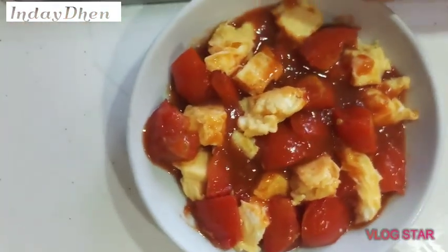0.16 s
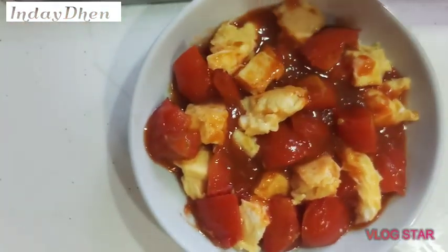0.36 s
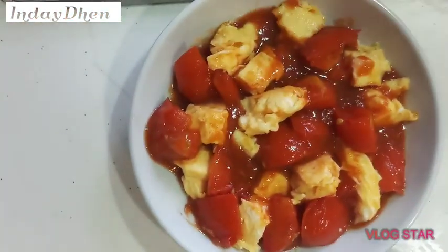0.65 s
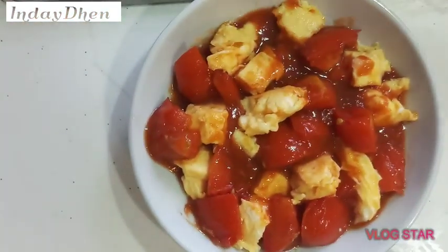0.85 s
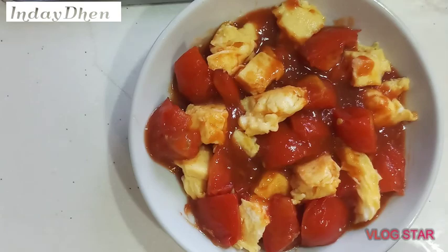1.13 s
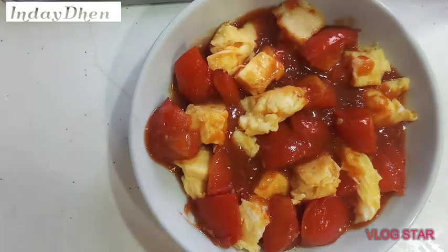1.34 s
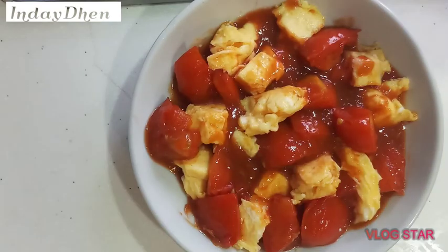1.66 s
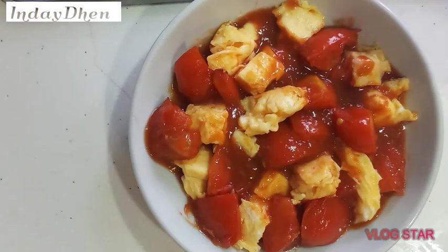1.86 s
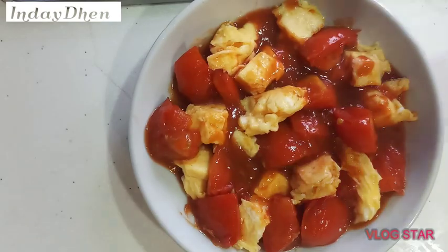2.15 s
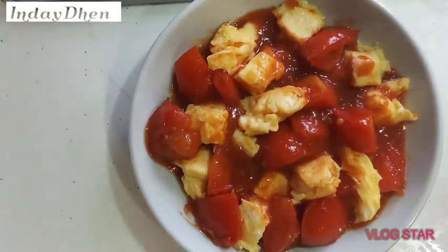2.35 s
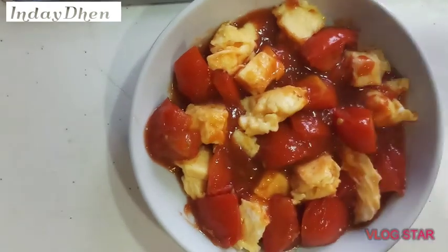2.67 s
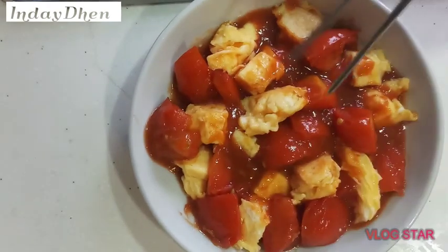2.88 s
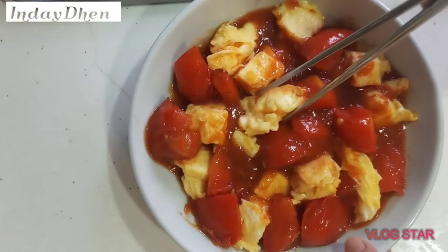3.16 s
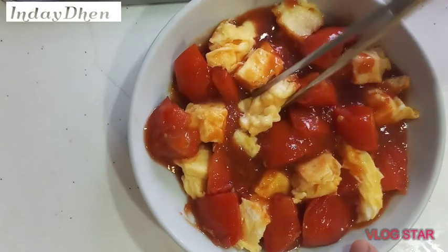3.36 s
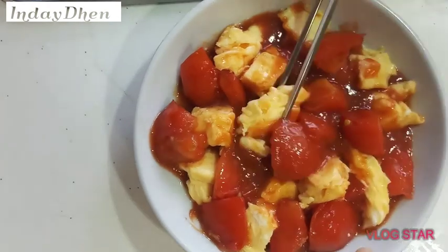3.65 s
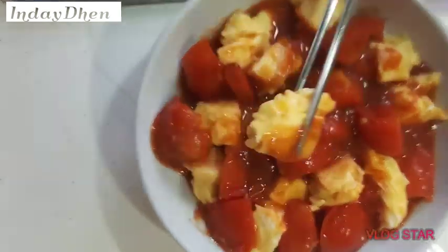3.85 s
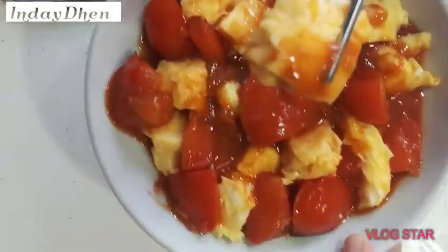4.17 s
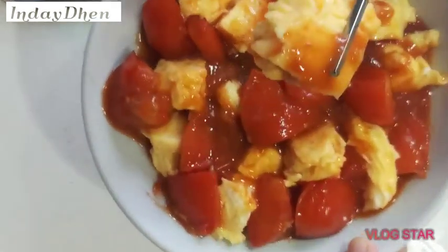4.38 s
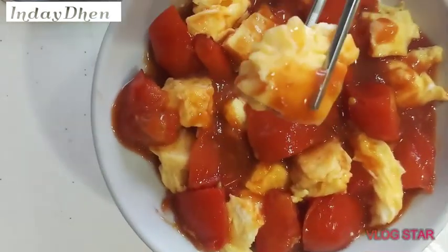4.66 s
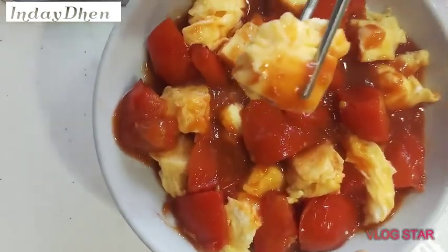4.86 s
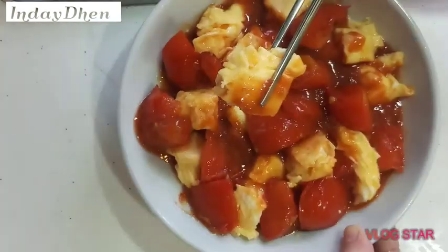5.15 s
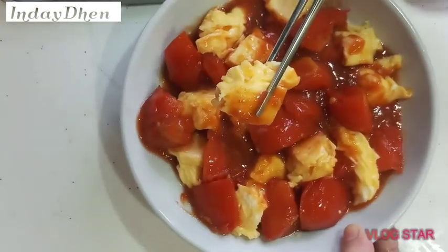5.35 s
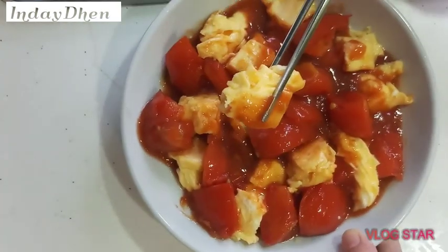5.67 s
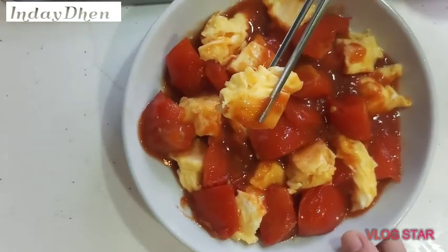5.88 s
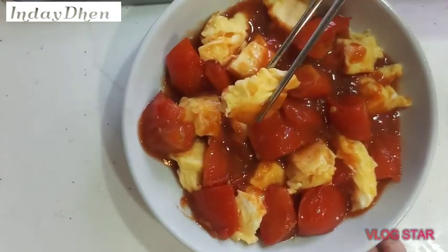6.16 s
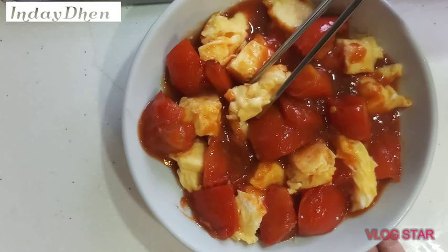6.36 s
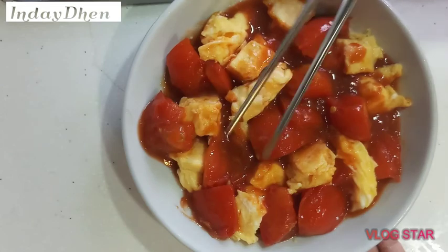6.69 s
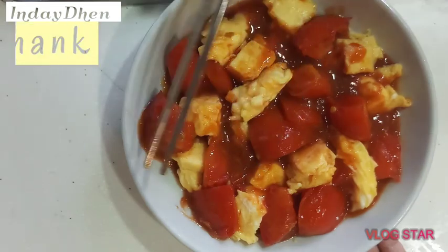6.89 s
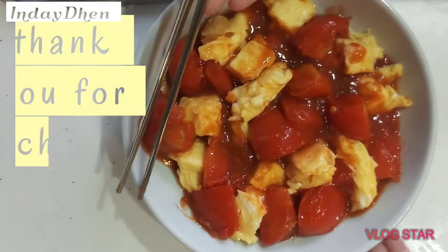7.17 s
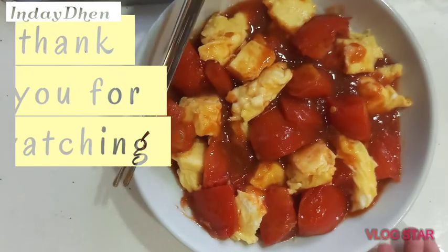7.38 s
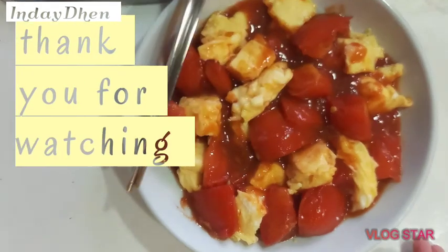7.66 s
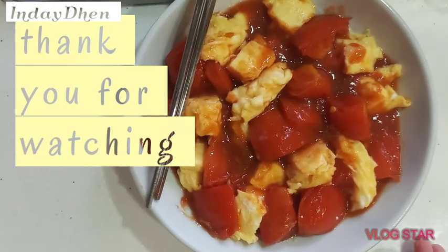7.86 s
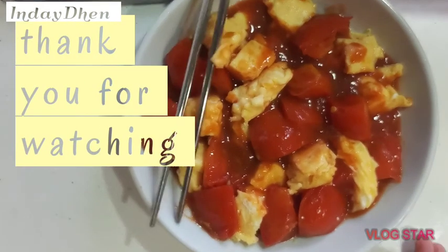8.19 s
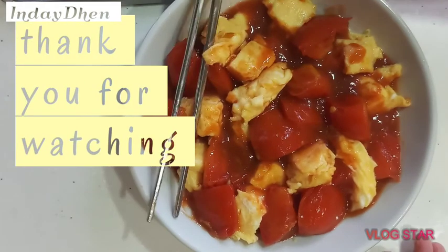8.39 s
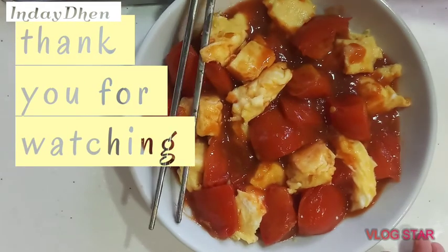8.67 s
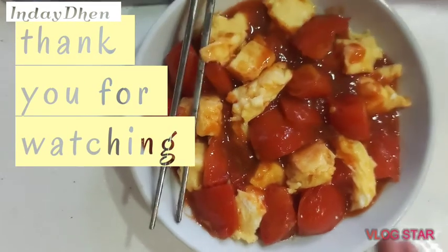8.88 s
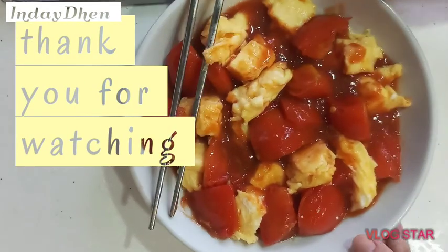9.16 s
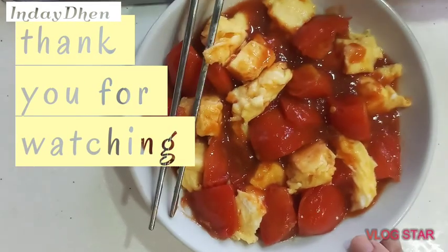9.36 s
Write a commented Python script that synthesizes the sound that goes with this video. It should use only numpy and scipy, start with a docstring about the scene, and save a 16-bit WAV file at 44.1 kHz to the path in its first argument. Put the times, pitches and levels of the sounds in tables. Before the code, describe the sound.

An extractor fan hums steadily in a small kitchen. After a dull knock, steel chopsticks scrape briefly off a counter close to the microphone and click lightly together. Two more wooden knocks follow. Then the chopsticks tap and rub against a ceramic bowl in a run of bright, ringing clicks, ending with one loud clatter as they drop on the rim.

```python
"""An extractor fan hums steadily in a small kitchen, and a dull knock sounds nearby.
In front of the microphone, steel chopsticks are dragged off a counter and click together, ringing in
their bending modes. More knocks follow; the sticks are laid on a ceramic bowl's rim, then dropped there.
The two microphone ports hear the bass alike and the treble apart; loud hits pull the gain down."""
import sys
import numpy as np
from scipy import signal
from scipy.fft import rfft, irfft, next_fast_len
from scipy.io import wavfile
from scipy.ndimage import uniform_filter1d

SR = 44100
rng = np.random.default_rng(int(sys.argv[2]) if len(sys.argv) > 2 else 0)


def unload_wav(signal):
    """Save mono or channel-first audio to the path in sys.argv[1] as 16-bit WAV at rate SR, clipped to [-1, 1]."""
    wavfile.write(
        sys.argv[1],
        SR,
        np.round(np.clip(np.atleast_2d(signal).T, -1, 1) * 32767).astype(np.int16),
    )


N = 420273

# Stick clicks: time_s, level_db, ring_share (of the free ring), tilt_db_per_octave, second_stick_db,
# then how hard the first stick's modes are caught: main_pair_db, top_pair_db, low_group_db
STICK_CLICKS = [(1.875, -29.5, 0.2, -3, -1, -14, -4, 0.1), (1.903, -29.5, .3, 1, 8, -14, -3, 0.1),
                (2.001, -27.5, 0.17, 2, 10, -8, -4, 0.1), (2.040, -30, .16, 5, 11, -8, -3, 0.1),
                (2.130, -24.5, .22, -3, 3, -8, -3, 0.1), (2.141, -17, .27, 15, 8, -5, 0.1, 0.1),
                (2.150, -20.5, .3, 5, 6, -3, 0.1, 0.1), (2.209, -37, .3, 14, 12, -5, 0.1, 0.1),
                (2.735, -42, .98, -5, 28, 0.1, 0.1, 0.1), (2.808, -34, .4, 11, 28, 0.1, 0.1, 0.1),
                (2.943, -25, 0.37, -1, 28, 0.1, 0.1, 0.1), (3.429, -21, 0.094, 0, 10.5, 0, -4, 0.1),
                (3.575, -34.5, .25, 0, 3, -2, -3, 0.1), (6.833, -44, .6, 2, 20, 0.1, 0.1, 0.1),
                (7.139, -28, .3, -0.5, -14, -14, -12, -1), (7.152, -31, 0.62, 2, -14, 5, -5, -2),
                (7.259, -22.5, 0.59, 7, -8, -14, -4, 0.1), (7.269, -31, .4, -2, -8, -4, -5, -3),
                (7.351, -32.5, .4, 0, -18, -3, -14, -8), (7.372, -38, .3, -3, -6, -1, -10, -3),
                (7.647, -31.5, 0.46, 2, -3, -3, -9, -3), (7.713, -35, 0.76, -7, -14, -6, -12, -5),
                (7.877, -36, .6, -2, -14, 7, -12, -5), (7.935, -18, 0.23, 4, -11, 4, 1, -9),
                (7.942, -21, 0.21, 4, -7, 1, -1, -7), (8.060, -43, .2, -7, -11, -8, -10, -8),
                (8.18, -32, 0.32, -4, -14, 6, -8, -3), (8.206, -28, 0.32, 1, -7, 1, -3, -10),
                (8.221, -29, .28, 2, -9, -6, -2, -7), (8.590, -21.5, 0.28, -1, -18, 1, -10, 6),
                (8.642, -23.5, .16, -1, -14, 4, -7, 2), (8.662, -35, .35, -2, -14, -1, -10, 3),
                (8.762, -22, .28, -1, -8, -4, -4, -5), (8.771, -23, .28, -3, -10, -3, 5, -2),
                (8.802, -37, .3, 7, -3, -2, -5, 3), (9.057, -3, .54, -1, -12, 11.5, 10, 6),
                (9.064, -10, 0.62, 0.5, -5, 2, 11, 0.1), (9.073, -11, 0.58, -1, -8, 3, 5, 0.1)]
MAIN_PAIR_HZ, TOP_PAIR_HZ, LOW_GROUP_HZ = (7300, 7550), (14000, 14300), (4900, 5500)
# Bending modes of each stick: pitch_hz, level_db, t60_s
FIRST_STICK_MODES = [(4953, -9, .07), (5250, -12, .05), (5385, -10, .05), (6300, -16, .05),
                     (6907, -16, .075), (7365, -3, .1), (7488, 0, .11), (7660, -9, .09), (8100, -14, .07),
                     (10560, -7, .06), (10640, -8, .07), (14055, -8, .1), (14170, -13, .08)]
SECOND_STICK_MODES = [(3400, -14, .03), (5600, -16, .04), (8395, -4, .09), (8650, -9, .07),
                      (9200, -12, .09), (12390, -4, .09), (12750, -6, .075), (13460, -12, .09),
                      (15300, -13, .06)]
# Where the sticks are (on the counter, lifted, in the food, on the rim): until_s, crack_db, thud_db
STICK_PLACES = [(2.135, 8.5, -5.5), (3.1, 7, -34), (6.9, 8.5, -35), (9.6, -9.5, -33)]
# Sticks rubbing on the rim or each other: start_s, strongest_s, end_s, level_db, scrape_db
RUB_STROKES = [(7.135, 7.157, 7.3, -62, 2), (7.29, 7.355, 7.45, -60, 2), (7.86, 7.905, 7.97, -50, -2),
               (7.916, 7.932, 7.968, -48, 4), (8.04, 8.062, 8.08, -64, 15), (8.15, 8.205, 8.24, -51.5, 6),
               (9.05, 9.065, 9.02, -37, -7)]
# Touches that ring the bowl: time_s, peak_db
BOWL_TOUCHES = [(7.139, -43), (7.151, -45), (7.372, -36), (7.91, -50), (7.95, -48), (8.766, -37),
                (9.057, -23)]
# Modes of the bowl's rim: pitch_hz, level_db, t60_s
RIM_MODES = [(4680, 0, .05), (4760, -3, .045)]
# Sticks dragged over the counter: start_s, strongest_s, end_s, level_db, treble_db
DRAG_STROKES = [(1.87, 1.905, 2.1, -60.5, 11), (2.053, 2.125, 2.14, -62, 12.5),
                (2.127, 2.173, 2.217, -31.5, 0.5), (2.196, 2.201, 2.222, -37, -8),
                (2.252, 2.278, 2.32, -58, 6)]
# Resonances of the counter's board: pitch_hz, width_hz, level_db
BOARD_MODES = [(810, 400, -9), (1030, 150, -7), (1194, 64, 5.5), (1593, 104, 2), (1970, 99, -8),
               (2880, 300, -7), (3430, 340, -14)]
# Nearby knocks: time_s, level_db, tilt_db_per_octave, rattle_db, snap_db, thud_db
DULL_KNOCKS = [(0.341, -25.5, -2, -4, -9, -3.5), (5.48, -16.5, 4, -1.5, 16, 1.5),
               (5.485, -15.5, -1, -1, 0, 1), (5.898, -22, -1.5, -12, -4, -9),
               (5.906, -24.5, -6, -10, -6, 10), (5.965, -25.5, 0.1, -2, -5, -7),
               (5.9693, -18, 1, -4, -3, 6)]
# Modes of the knocked wood and of its hard edge: pitch_hz, level_db, t60_s
WOOD_MODES = [(235, -22, 0.07), (360, -1.5, 0.063), (447, 0, 0.06), (640, -14, 0.028), (750, -3.5, 0.086),
              (960, 2.5, 0.046), (1070, -3.5, 0.091), (1348, 2, 0.055), (2100, -29, 0.032),
              (2570, -19, 0.03), (3500, -23, 0.031), (3580, -1, 0.026), (4640, -18, 0.034)]
EDGE_MODES = [(1120, -3, .016), (2450, -1, .011), (2750, -2, .010), (3800, -4, .009), (4900, -5, .009),
              (8000, -22, .006), (11500, -30, .005)]
# Faint rustles: start_s, strongest_s, end_s, level_db
RUSTLE_STROKES = [(2.3, 2.55, 3.9, -55), (6.1, 6.4, 7.1, -51.5)]
# Spectral shape of the fan's rushing air: frequency_hz, level_db
AIR_SPECTRUM = [(15, -66), (25, -34), (123, -11.5), (157, -5.5), (190, -3), (249, -5.5), (277, -15),
                (373, -3), (520, -16.5), (640, -14), (1100, -12), (1400, -23), (1610, -15), (2110, -21),
                (7920, -29.5), (16000, -44.5)]
# Duct resonances: pitch_hz, width_hz, lift_db
DUCT_MODES = [(68.2, 4.6, 10), (197, 7.8, 10), (254.4, 24, 5), (417, 65, 5), (1255, 130, 7.5),
              (1610, 20, 1), (3870, 100, 4.5), (6130, 740, 4), (7930, 2700, 3.5)]
# Fan motor tones: pitch_hz, rms_db
MOTOR_TONES = [(107.7, -64), (188.4, -50), (376.8, -53), (565.2, -68), (1115, -60), (1244, -66),
               (1416, -73), (1637, -72), (2476, -74), (2810, -76)]
# How alike the two ports hear: frequency_hz, correlation
PORT_LIKENESS = [(25, .96), (60, .988), (150, .995), (340, .99), (690, .84), (1030, .7), (1400, .3),
                 (2070, .55), (3000, .35), (5000, .15), (15000, .05)]
# The housing's shading of the fan and of near sounds: frequency_hz, left_minus_right_db
FAN_SHADING = [(60, 0.0), (110, 0.0), (200, 0.0), (380, -0.5), (700, -3.0), (1290, -6.5), (2380, -1.0),
               (4400, 2.5), (8120, 0.5), (15000, 2.0)]
NEAR_SHADING = [(300, 0), (1100, -5), (2400, 3), (3800, 1), (5000, 3.5), (7500, 2), (9000, 2.5), (14000, 3)]
# Phase between the ports for the same two: frequency_hz, left_lead_rad
FAN_PHASE = [(300, 0.0028), (950, 0.02), (1800, 2.68), (3100, 4.6), (5000, 3.57)]
NEAR_PHASE = [(300, 0), (1000, 0.6), (2000, 1.7), (5000, 1.5), (12000, 1.7)]


def stick_clicks():
    """Each click rings both sticks, cracks at the contact and pushes the counter's board."""
    out, pushes = quiet(), quiet()
    for time_s, db, ring_share, tilt_db, second_db, main_db, top_db, low_db in STICK_CLICKS:
        _, crack_db, thud_db = next(place for place in STICK_PLACES if time_s < place[0])
        crack_db += tilt_db - 25.5 * ring_share   # a free ring hides the crack, a hard contact bares it
        brightness = 2 ** (tilt_db / 6)
        crack = from_db(crack_db) * burst(3900 * brightness, 10300 * brightness, t60_s=0.24 * ring_share)
        modes = lifted(FIRST_STICK_MODES, *MAIN_PAIR_HZ, main_db)
        modes = lifted(modes, *TOP_PAIR_HZ, top_db)
        modes = lifted(modes, *LOW_GROUP_HZ, low_db)
        first = strike(modes, ring_share, tilt_db)
        second = from_db(second_db) * strike(SECOND_STICK_MODES, ring_share, tilt_db)
        add(out, time_s, from_db(db) * (first + second + crack) / (1 + from_db(second_db)))
        add(pushes, time_s, from_db(db + thud_db) * burst(380, 6500, t60_s=0.0035))
    return out + board(pushes)


def stick_rubs():
    """Dense tiny slips ring the sticks' modes, hiss, and scrape dryly on the glaze."""
    catches = grains(per_s=1300, spread_db=1.3)
    swell = dict(ends_db=23.4, roundness=0.8)
    slips = catches * strokes(RUB_STROKES, **swell)
    scrape_db = [row[-1] for row in RUB_STROKES]
    scrape = catches * strokes(RUB_STROKES, **swell, extra_db=scrape_db) + 1e-18
    out = bandpass(scrape, 2600, 6900)
    out += from_db(15) * resonate(scrape, 6500, 500)   # the glaze colours the scrape
    out += from_db(14) * resonate(scrape, 4740, 250)   # and so does the rim
    damped = lifted(FIRST_STICK_MODES, *LOW_GROUP_HZ, -9)   # lying on the rim damps these modes
    damped = lifted(damped, *TOP_PAIR_HZ, -1)
    for modes, ring_db, width_factor in (damped, 27, 12.3), (SECOND_STICK_MODES, 17, 13):
        for hz, db, t60_s in modes:
            out += from_db(db + ring_db) * resonate(slips, hz, width_factor / t60_s)
    hiss = from_db(-9) * np.diff(slips, prepend=0)
    return out + hiss


def bowl_rim():
    """The food-filled bowl rings briefly on one close pair of modes."""
    out = quiet()
    for time_s, db in BOWL_TOUCHES:
        add(out, time_s, from_db(db) * strike(RIM_MODES))
    return out


def stick_drags():
    """The tips judder over the counter: its board drones, the steel hisses."""
    swell = dict(ends_db=32, roundness=3.6)
    hiss = bandpass(grains(per_s=6000, spread_db=4.6), 2200, 14000, order=1)
    hiss *= strokes(DRAG_STROKES, **swell, extra_db=[row[-1] for row in DRAG_STROKES])
    judder = grains(per_s=3000, spread_db=3.7) * strokes(DRAG_STROKES, **swell)
    return board(judder) + hiss


def board(force):
    """The counter's board answers a push with its resonances."""
    return sum(from_db(db + 17) * resonate(force, hz, width_hz) for hz, width_hz, db in BOARD_MODES)


def knocks():
    """Nearby wood rings briefly under a rattle and a snap; a softer contact keeps upper modes quiet."""
    out = quiet()
    for time_s, db, tilt_db, rattle_db, snap_db, thud_db in DULL_KNOCKS:
        modes = lifted(WOOD_MODES, low_hz=0, high_hz=700, db=thud_db)
        blow = strike(modes, tilt_db=tilt_db, pivot_hz=1500, scatter_db=2.5)
        rattle = from_db(rattle_db) * burst(230, 3200 * 2 ** (tilt_db / 5), t60_s=0.046)
        snap = from_db(snap_db) * strike(EDGE_MODES, scatter_db=1)
        add(out, time_s, from_db(db) * (blow + rattle + snap))
    return bandpass(out, 130, 10500)


def rustle():
    """Fine dry grains in the treble, perhaps a sleeve near the microphone."""
    crinkle = resonate(grains(per_s=6000, spread_db=3), hz=8300, width_hz=5000)
    return crinkle * strokes(RUSTLE_STROKES, ends_db=22, roundness=2)


def extractor_fan():
    """Air noise lifted at the duct's resonances, plus wavering motor tones; returns mid and side."""
    size, t = next_fast_len(N, real=True), np.arange(N) / SR
    hz = np.arange(size // 2 + 1) * SR / size
    duct_db = sum(db / (1 + (2 * (hz - pitch) / width) ** 2) for pitch, width, db in DUCT_MODES)
    noise_spectrum = rfft(rng.standard_normal((2, size)))
    air = irfft(noise_spectrum * from_db(at_hz(AIR_SPECTRUM, hz) + duct_db), size)[:, :N]
    out = from_db(-41.5 + .5 * drift(per_s=1.91)) * rms_one(air)
    wobble_s = 0.002 * np.cumsum(drift(per_s=6)) / SR   # the shaft speed wanders a little
    for pitch_hz, db in MOTOR_TONES:
        cycles = pitch_hz * (t + wobble_s) + rng.random((2, 1))
        out += np.sqrt(2) * from_db(db + 2.5 * drift(per_s=10)) * np.sin(2 * np.pi * cycles)
    return out


def nearby_echoes(x, echo_db=-34, t60_s=0.092):
    """Fast-dying echoes off counter and tiles; returns mid (with the direct sound) and side."""
    t = np.arange(SR // 6) / SR
    shared, apart = from_db(echo_db - 60 * t / t60_s) * rng.standard_normal((2, len(t))) * (t > .001)
    shared[0] = 1   # the direct sound
    return signal.oaconvolve(x, shared)[:N], from_db(2) * signal.oaconvolve(x, apart)[:N]


def microphone(mid, side, shading, phase):
    """Two ports: alike in the bass, apart in the treble, each shaded and delayed by the housing."""
    size = next_fast_len(N + SR // 10, real=True)
    hz = np.arange(size // 2 + 1) * SR / size
    alike = at_hz(PORT_LIKENESS, hz)
    to_left = from_db(at_hz(shading, hz) / 2) * np.exp(.5j * at_hz(phase, hz))
    shared = rfft(mid, size) * np.sqrt(1 + alike)
    apart = rfft(side, size) * np.sqrt(1 - alike)
    left, right = (shared + apart) * to_left, (shared - apart) / to_left
    return irfft(np.array([left, right]), size)[:, :N] / np.sqrt(2)


def strike(modes, ring_share=1, tilt_db=0, pivot_hz=7500, scatter_db=2):
    """Decaying sines of one blow, each mode caught with its own strength and phase; peak 1."""
    t = np.arange(SR // 8) / SR
    hz, db, t60_s = np.transpose(modes)[:, :, None]
    db = db + tilt_db * np.log2(hz / pivot_hz) + scatter_db * rng.normal(0, 1, hz.shape)
    swing = np.sin(2 * np.pi * (hz * t + rng.random(hz.shape)))
    decay = from_db(db - 60 * t / (t60_s * max(ring_share, .05)))
    attack = 1 - np.exp(-t / 0.00009)
    sound = np.sum(decay * swing, axis=0) * attack
    return sound / np.abs(sound).max()


def burst(low_hz, high_hz, t60_s):
    """Band noise dying fast; starts at rms 1."""
    t = np.arange(SR // 8) / SR
    noise = bandpass(rng.standard_normal(len(t)), min(low_hz, .4 * SR), min(high_hz, .45 * SR))
    return rms_one(noise) * from_db(-60 * t / max(t60_s, .002))


def grains(per_s, spread_db):
    """Uneven tiny impacts; rms 1."""
    sizes = from_db(spread_db * np.minimum(rng.exponential(1, N), 4)) * rng.choice([-1, 1], N)
    return rms_one(sizes * (rng.random(N) < per_s / SR))


def strokes(rows, ends_db, roundness, extra_db=0):
    """Gain of strokes that swell and fade, ends_db down at each end and silent between."""
    t, out = np.arange(N) / SR, np.zeros(N)
    for (start, top, end, db, *_), more_db in zip(rows, np.broadcast_to(extra_db, len(rows))):
        away = np.interp(t, [start, top, end], [1, 0, 1])
        out += from_db(db + more_db - ends_db * away ** roundness) * (away < 1)
    return out


def lifted(modes, low_hz, high_hz, db):
    """The same modes with one range caught harder or softer."""
    return [(hz, level_db + db * (low_hz < hz < high_hz), t60_s) for hz, level_db, t60_s in modes]


def resonate(x, hz, width_hz):
    """Two-pole resonance with gain 1 on top."""
    r = np.exp(-np.pi * width_hz / SR)
    gain = (1 - r * r) / 2
    return signal.lfilter([gain, 0, -gain], [1, -2 * r * np.cos(2 * np.pi * hz / SR), r * r], x)


def bandpass(x, low_hz, high_hz, order=2):
    """Keep one band."""
    return signal.sosfilt(signal.butter(order, [low_hz, high_hz], "band", fs=SR, output="sos"), x)


def drift(per_s):
    """Slow wander between random values of spread 1."""
    return np.interp(np.arange(N) / SR * per_s, np.arange(400), rng.standard_normal(400))


def at_hz(points, hz):
    """Read (frequency_hz, value) points on a log-frequency axis."""
    points_hz, values = np.transpose(points)
    return np.interp(np.log(hz + 1), np.log(points_hz), values)


def add(out, time_s, sound):
    """Mix a sound in at a time."""
    i = round(time_s * SR)
    out[i:i + len(sound)] += sound[:N - i]


def quiet():
    """A nearly silent track; the faint noise keeps recursive filters fast."""
    return rng.normal(0, 1e-9, N)


def from_db(db):
    """Gain of a level in dB."""
    return 10 ** (np.asarray(db) / 20)


def rms_one(x):
    """Scale to rms 1."""
    return x / np.sqrt(np.mean(x ** 2) + 1e-20)


def scene():
    """The kitchen from the microphone: the bowl in front, the fan off to one side."""
    near = stick_clicks() + stick_rubs() + bowl_rim() + stick_drags() + knocks() + rustle()
    fan = microphone(*extractor_fan(), FAN_SHADING, FAN_PHASE)
    return microphone(*nearby_echoes(near), NEAR_SHADING, NEAR_PHASE) + fan


def record(dry):
    """The recorder's gain control hears the lower band, ducks fast and recovers slowly; the top is cut."""
    threshold_db, recovery_db_per_s, cutoff_hz = -23, 3, 16300
    lower_band = signal.sosfilt(signal.butter(2, 4000, fs=SR, output="sos"), dry.mean(axis=0))
    level_db = 10 * np.log10(uniform_filter1d(lower_band ** 2, size=441) + 1e-12)
    duck_db = 0.47 * np.maximum(level_db - threshold_db, 0)
    recovery_db = recovery_db_per_s * np.arange(N) / SR
    held_db = np.maximum.accumulate(duck_db + recovery_db) - recovery_db
    held_db = signal.lfilter([.003], [1, -.997], held_db)   # attack of about 8 ms
    top_cut = signal.cheby2(12, 60, cutoff_hz, fs=SR, output="sos")
    return signal.sosfilt(top_cut, dry * from_db(-held_db))


dry = scene()
out = record(dry)
unload_wav(out)
```